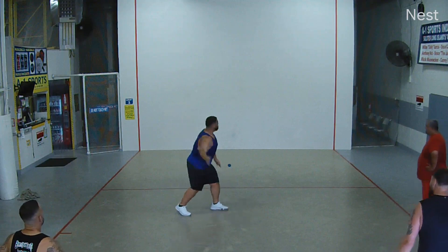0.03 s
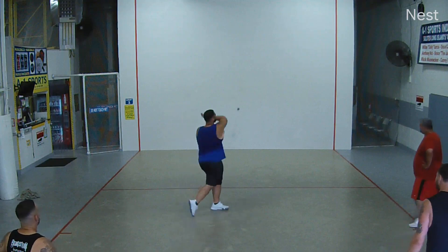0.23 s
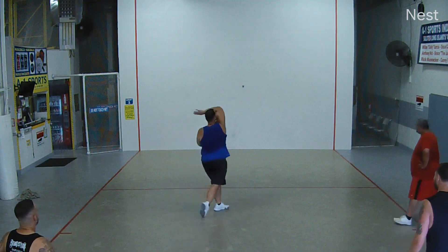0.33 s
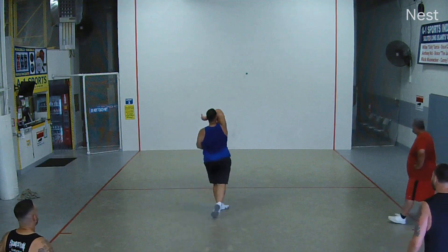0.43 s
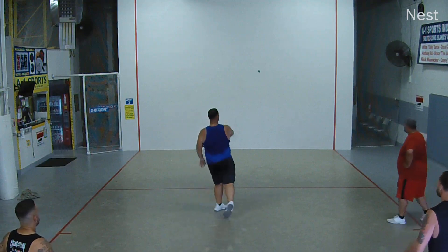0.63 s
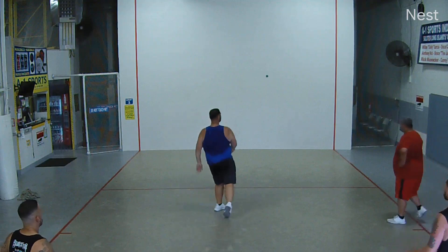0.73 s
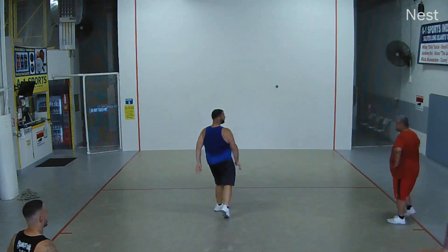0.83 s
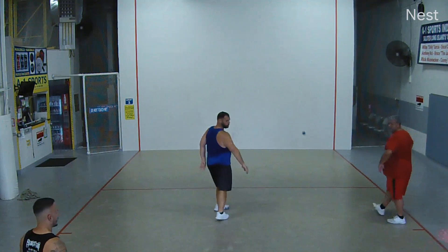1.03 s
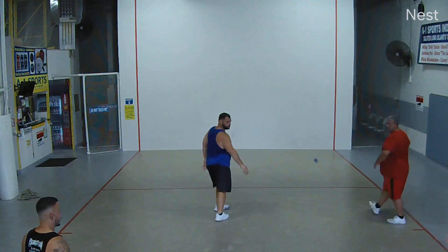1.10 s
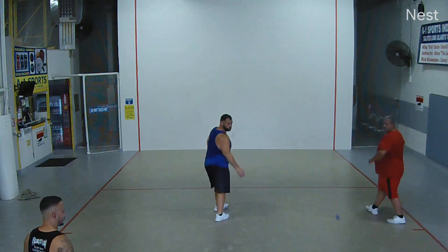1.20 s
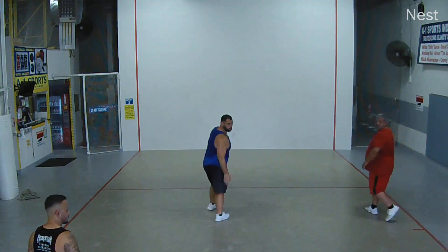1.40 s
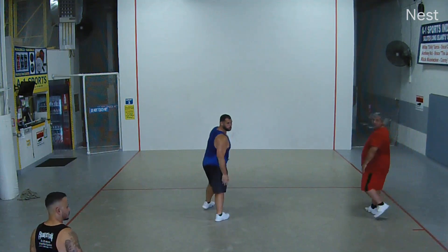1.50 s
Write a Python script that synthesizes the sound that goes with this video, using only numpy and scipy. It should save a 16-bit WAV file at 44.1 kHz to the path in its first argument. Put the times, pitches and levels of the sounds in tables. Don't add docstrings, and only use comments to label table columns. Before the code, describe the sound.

An open palm smacks a small hollow rubber ball, which hits the front wall a moment later with a louder crack; a faint floor bounce follows in a reverberant indoor court with fans, through a thin distant microphone.

```python
import sys
import numpy as np
from scipy import signal
from scipy.fft import rfft, irfft, dct
from scipy.io import wavfile
from scipy.ndimage import uniform_filter1d

SR = 44100
rng = np.random.default_rng(int(sys.argv[2]) if len(sys.argv) > 2 else 0)


def convert_level_to_amplitude(level_db):
    exponent = np.asarray(level_db, float) / 20
    return 10 ** exponent


def output_pcm(signal):
    pcm = np.clip(np.atleast_2d(signal).T, -1, 1) * 32767
    wavfile.write(sys.argv[1], SR, np.round(pcm).astype(np.int16))


N = 68355


def evened(x):
    return x / np.sqrt(np.mean(x ** 2) + 1e-20)


def read(points, hz):
    point_hz, value = np.transpose(points)
    return np.interp(np.log(hz + 1), np.log(point_hz + 1), value)


# pitch_hz, level_db (per Hz)
FAN_COLOUR = [(59, -47), (100, -35), (368, -12), (540, -7), (592, -2.5), (1150, -5), (2340, -6.5),
              (6420, -30.5), (8000, -50.5), (10400, -94), (17600, -120)]


def fans():
    level_db, patch_db, swell_db = -48, 1.0, 0.3
    frames, hz = N // 256 + 5, np.fft.rfftfreq(1024, 1 / SR)
    real, imag, patches = rng.standard_normal((frames, 513, 3)).T
    swell = evened(uniform_filter1d(patches.mean(0), size=12))
    patches = uniform_filter1d(patches, size=10, axis=0)
    patches = evened(uniform_filter1d(patches, size=12, axis=1))
    gain_db = read(FAN_COLOUR, hz)[:, None] + patch_db * patches + swell_db * swell
    rush = signal.istft((real + 1j * imag) * convert_level_to_amplitude(gain_db), nperseg=1024, noverlap=768)[1][:N]
    return convert_level_to_amplitude(level_db) * evened(rush)


def add(mix, start_s, sound):
    part = mix[round(start_s * SR):][:len(sound)]
    part += sound[:len(part)]


def modes(table):
    t = np.arange(2048) / SR
    out = 0
    for pitch_hz, width_hz, level_db in table:
        decay = np.exp(-np.pi * width_hz * t)
        out = out + convert_level_to_amplitude(level_db) * decay * np.sin(2 * np.pi * pitch_hz * t)
    return out


def click(colour):
    log = np.log(convert_level_to_amplitude(read(colour, abs(np.fft.fftfreq(4096, 1 / SR)))))
    shape = np.fft.ifft(np.exp(log - 1j * signal.hilbert(log).imag)).real[:2048]
    return shape / abs(shape).max()


# pitch_hz, t60_s
HALL_DECAY = [(150, 0.4), (300, 0.79), (700, 1.7), (1200, 2.124), (2000, 2.), (3500, 1.8), (6000, 1.275)]


def hall(build_s=0.035):
    spacing = 20
    taps, at = np.zeros(N), np.arange(0, N - spacing, spacing)
    taps[at + rng.integers(0, spacing, len(at))] = rng.choice([-1., 1.], len(at))
    hz, t, z = signal.stft(evened(taps), SR, nperseg=256)
    decay = convert_level_to_amplitude(-60 * t / read(HALL_DECAY, hz)[:, None])
    tail = signal.istft(z * decay, SR, nperseg=256)[1][:N]
    return tail * (1 - np.exp(-np.arange(N) / SR / build_s))


def blow(arrivals, ring, snap, colour, ring_tail_db, crack_tail_db, click_db):
    ring_rise_s, scatter_s, echo_width_hz, thin_hz = 0.0015, 0.003, 75, 190
    ring, snap, tick = modes(ring), modes(snap), convert_level_to_amplitude(click_db) * click(colour)
    crack = snap + tick
    echo = snap + convert_level_to_amplitude(-6) * tick
    out, t = np.zeros(N), np.arange(len(ring)) / SR
    for start_s, pitch_hz, ring_db, crack_db in arrivals:
        scatter = rng.standard_normal(len(t)) * np.exp(-t / scatter_s)
        ping = modes([(pitch_hz, echo_width_hz, 0)]) * (1 - np.exp(-t / ring_rise_s))
        slap = signal.fftconvolve(echo, scatter) / np.linalg.norm(scatter)
        add(out, start_s, convert_level_to_amplitude(ring_db) * ping / abs(ping).max())
        add(out, start_s, convert_level_to_amplitude(crack_db + 7) * slap)
    source = convert_level_to_amplitude(ring_tail_db) * ring / np.linalg.norm(ring)
    source = source + convert_level_to_amplitude(crack_tail_db) * crack / np.linalg.norm(crack)
    first_s = arrivals[0][0]
    add(out, first_s, signal.fftconvolve(hall(), source))
    return signal.sosfilt(signal.butter(6, thin_hz, "high", fs=SR, output="sos"), out)


# start_s, pitch_hz (loudest ring), ring_db, crack_db
HAND_ARRIVALS = [
    (.2185, 960, -42, -32),
    (.232, 960, -44, -38),
    (.2435, 945, -26, -40),
    (.249, 960, -30, -44),
    (.2575, 960, -33, -36),
    (.281, 960, -28, -36),
    (.2955, 955, -22, -42),
    (.335, 980, -34, -44),
    (.44, 990, -35, -48),
]
# pitch_hz, width_hz, level_db
HAND_SHELL = [(976.6, 74, -0.5), (266, 80, -19.5)]
# pitch_hz, width_hz, level_db
HAND_UPPER = [(1732, 120, -8.5), (2320, 900, -9), (3780, 1200, 7), (5700, 1000, -9.5)]
# pitch_hz, level_db
SOFT_CLICK = [(150, -33), (250, -12.5), (600, -12.5), (1300, 10), (2600, 1), (4500, -6), (7000, -4),
              (8800, -34)]


def hand_smack():
    return blow(HAND_ARRIVALS, HAND_SHELL, HAND_UPPER, SOFT_CLICK,
                ring_tail_db=-34, crack_tail_db=-34, click_db=4.5)


# start_s, pitch_hz (loudest ring), ring_db, crack_db
WALL_ARRIVALS = [(.554, 900, -40, -33), (.5615, 1700, -23, -24), (.571, 1950, -27, -29),
                 (.576, 770, -19, -33), (.584, 1250, -23, -36), (.585, 740, -24, -34),
                 (.6085, 1030, -21, -36), (.622, 1100, -25, -38), (.636, 1100, -24, -34),
                 (.646, 1250, -27, -31), (.662, 1200, -26, -34), (.77, 1000, -33, -38),
                 (.816, 1250, -30, -38)]
# pitch_hz, width_hz, level_db
WALL_SHELL = [(828, 130, -5), (1250, 88, -0.5), (1078, 190, -4.5), (356, 300, -12.5)]
# pitch_hz, width_hz, level_db
WALL_UPPER = [(1664, 86, -5), (2025, 200, -6.5), (2708, 160, -8.5), (5250, 810, -35)]
# pitch_hz, level_db
WALL_CLICK = [(150, -47.5), (300, -15), (600, 12.5), (1100, 10.5), (2400, -2), (3800, -16.5), (6800, -9.5),
              (8800, -61)]


def wall_hit():
    return blow(WALL_ARRIVALS, WALL_SHELL, WALL_UPPER, WALL_CLICK,
                ring_tail_db=-33.5, crack_tail_db=-28, click_db=4.0)


# start_s, pitch_hz (loudest ring), ring_db, crack_db
BOUNCE_ARRIVALS = [
    (1.423, 2750, -43, -46),
    (1.425, 260, -51, -60),
    (1.437, 950, -42, -54),
]
# pitch_hz, width_hz, level_db
BOUNCE_SHELL = [(880, 310, 1), (267, 44, -18)]
# pitch_hz, width_hz, level_db
BOUNCE_UPPER = [(2827, 310, -1.5), (3700, 390, 5.5), (6300, 320, -19)]


def floor_bounce():
    return blow(BOUNCE_ARRIVALS, BOUNCE_SHELL, BOUNCE_UPPER, SOFT_CLICK,
                ring_tail_db=-56, crack_tail_db=-52.5, click_db=9.5)


def scene():
    return (hand_smack() + wall_hit() + floor_bounce() + fans())[None]


STREAM_SR, LONG, SHORT = 16000, 1024, 128


def fold(x, edges, sign):
    x = x.copy()
    for at, half in edges:
        k = np.arange(half)
        turn = sign * np.pi / 4 * (1 - (k + .5) / half)
        after, before = x[at + k], x[at - 1 - k]
        x[at + k] = np.cos(turn) * after + np.sin(turn) * before
        x[at - 1 - k] = np.cos(turn) * before - np.sin(turn) * after
    return x


# pitch_hz, level_db (over the local level)
STEP_SIZE = [(150, 2), (450, -6), (800, -1), (1300, 2), (2000, 5), (3000, 8), (4500, 9), (7500, 8.5)]
# pitch_hz, level_db (against the block's mean power)
STEP_FLOOR = [(100, -34), (400, -41), (4000, -34.5), (7200, -28.5)]


def coarsen(lines):
    jitter_db, rounding, own_share = 2.5, 0.4, 0.85
    per = lines.shape[1] // 64
    own = (lines ** 2).reshape(len(lines), -1, per).mean(2)
    hz = (np.arange(own.shape[1]) + .5) / own.shape[1] * STREAM_SR / 2
    floor = own.mean(1, keepdims=True) * convert_level_to_amplitude(2 * read(STEP_FLOOR, hz))
    own = uniform_filter1d(own, size=3) + floor + 1e-18
    local = np.sqrt(own ** own_share * own.mean(0) ** (1 - own_share))
    step_db = read(STEP_SIZE, hz) + jitter_db * rng.standard_normal(len(hz))
    step = np.repeat(local * convert_level_to_amplitude(step_db), per, axis=1)
    return np.sign(lines) * np.floor(abs(lines) / step + rounding) * step


def stream(x):
    first_edge, short_frames = 663, (2, 8)
    low = np.pad(signal.resample(x, N * STREAM_SR // SR), (LONG, 2 * LONG))
    starts = range(first_edge, len(low) - 2 * LONG + 1, LONG)
    short = [k - 1 in short_frames for k in range(len(starts) + 1)]
    edges = []
    for k, s in enumerate(starts):
        edges.append((s, (SHORT if short[k] or short[k - 1] else LONG) // 2))
    for k, s in enumerate(starts):
        if short[k]:
            edges += [(s + j, SHORT // 2) for j in range(SHORT, LONG, SHORT)]
    low = fold(low, edges, 0.96)
    for k, s in enumerate(starts[:-1]):
        blocks = low[s:s + LONG].reshape(-1, SHORT if short[k] else LONG)
        lines = dct(blocks, type=4, norm="ortho")
        low[s:s + LONG] = dct(coarsen(lines), type=4, norm="ortho").ravel()
    return signal.resample(fold(low, edges, -1)[LONG:-2 * LONG], N)


def roll_off(x):
    return signal.sosfilt(signal.butter(12, 8960, fs=SR, output="sos"), x)


def record(dry):
    low_cut_hz, edge_hz, image_from_hz, image_db = 110, 7450, 7050, -20
    x = signal.sosfilt(signal.butter(4, low_cut_hz, "high", fs=SR, output="sos"), dry[0])
    lowpass = signal.firwin(801, edge_hz, window=("kaiser", 8), fs=SR)
    x = stream(signal.oaconvolve(x, lowpass, "same"))
    top = irfft(rfft(x) * (np.fft.rfftfreq(N, 1 / SR) > image_from_hz), N)
    image = convert_level_to_amplitude(image_db) * top * np.cos(2 * np.pi * STREAM_SR * np.arange(N) / SR)
    return roll_off((x + image)[None])


dry = scene()
out = record(dry)
output_pcm(out)
```